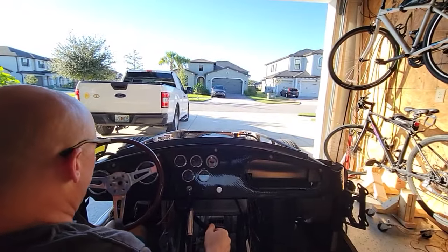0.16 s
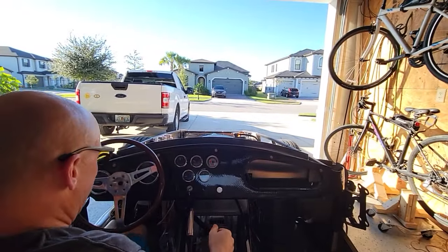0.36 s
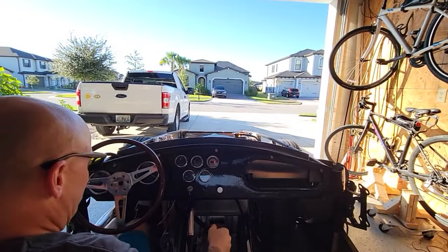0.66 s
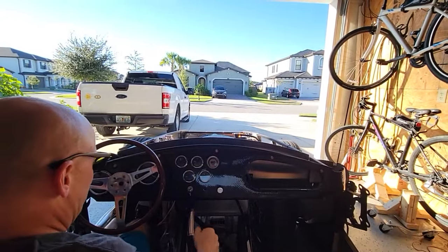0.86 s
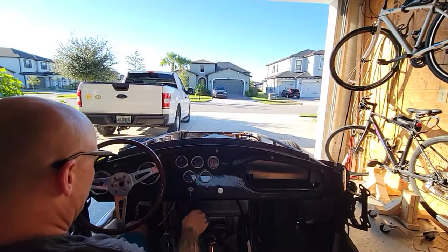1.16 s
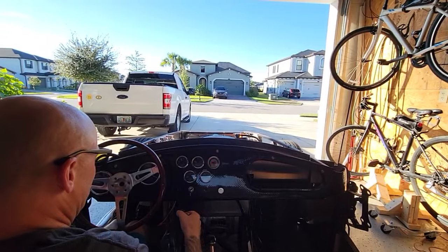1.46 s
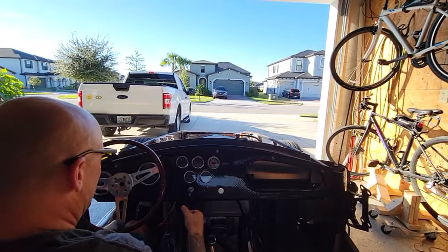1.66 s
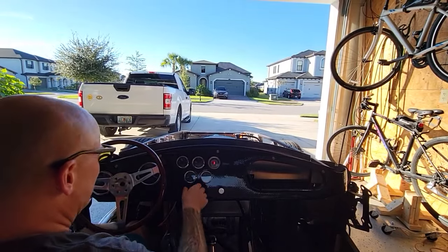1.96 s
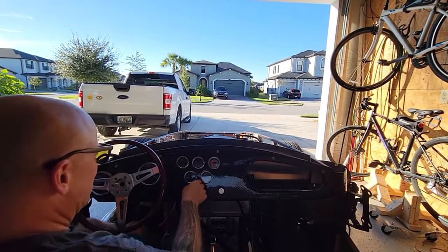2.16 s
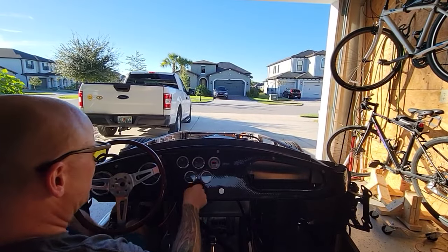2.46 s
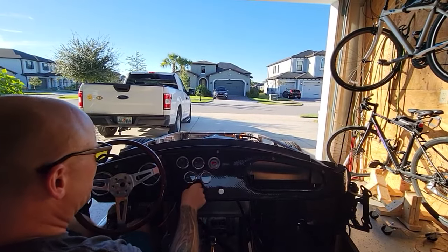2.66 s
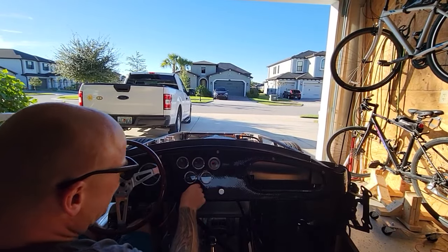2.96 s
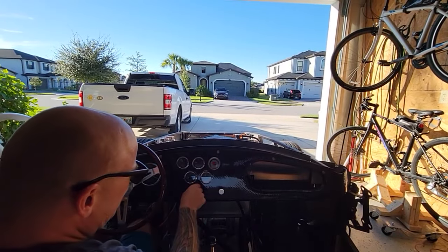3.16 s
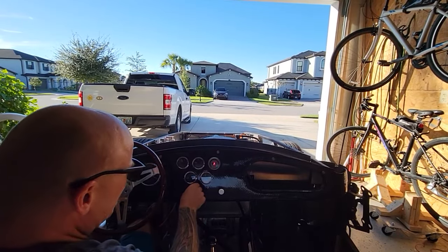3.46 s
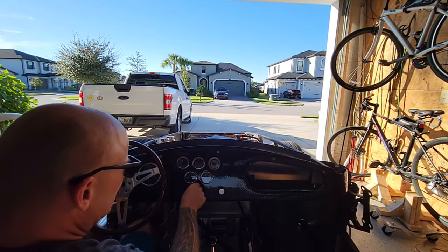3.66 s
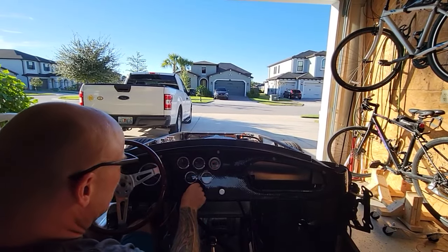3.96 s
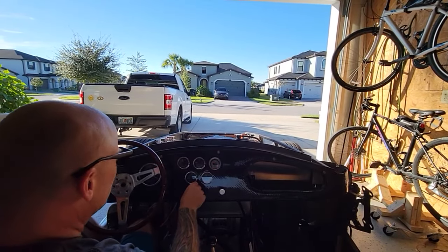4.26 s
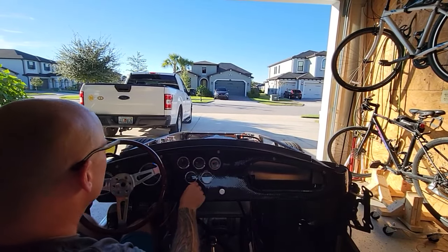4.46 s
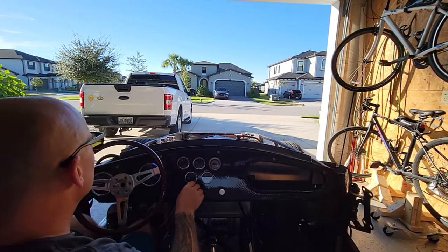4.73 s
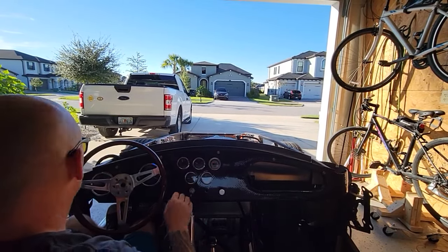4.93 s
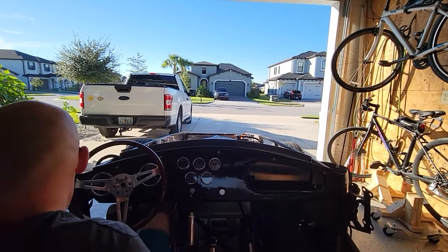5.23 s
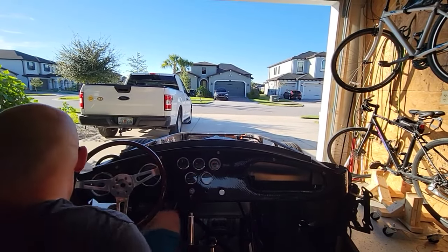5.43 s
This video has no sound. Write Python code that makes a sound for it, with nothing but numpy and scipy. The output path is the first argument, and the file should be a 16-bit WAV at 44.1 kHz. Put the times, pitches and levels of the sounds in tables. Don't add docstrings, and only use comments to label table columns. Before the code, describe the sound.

Close stereo sound in a kit-style car parked in an open garage: a deep, fluttering idle with slight speed hunting and airy hiss. Small key ticks and a bright metal clack come early, followed by rapid handbrake teeth. After about four seconds the engine is switched off, puffs and slows to a halt with a tiny belt squeak, then a soft low drone and sinking fan tone remain.

```python
import sys
import numpy as np
from scipy import signal
from scipy.fft import rfft, irfft, next_fast_len
from scipy.io import wavfile
from scipy.ndimage import uniform_filter1d, map_coordinates

SR = 44100
rng = np.random.default_rng(int(sys.argv[2]) if len(sys.argv) > 2 else 0)


def volts(x):
    e = np.asarray(x, float) / 20
    return 10 ** e


def int16_out(signal):
    q = np.round(np.clip(np.atleast_2d(signal).T, -1, 1) * 32767)
    wavfile.write(sys.argv[1], SR, q.astype(np.int16))


N = 246500

BANK_SIGNS = [1, -1, -1, 1, -1, 1, 1, -1]
CYLINDER_DB = [4.5, .3, -4.5, -.4, 4.2, 0, -4.2, .3]
# pitch_hz, level_db
PIPES_TOGETHER = [(20, -40), (45, -18), (58, -9), (77, 0), (96, -14), (125, -2), (154, 0), (175, -3),
                  (231, -19), (300, -24), (385, -22), (480, -28), (700, -34), (1500, -60)]
# pitch_hz, level_db
PIPES_APART = [(20, -34), (48, -12), (67, -14), (87, -15), (106, -7), (125, 0), (150, -4), (183, -12),
               (202, -8), (250, -28), (350, -22), (480, -28), (700, -32), (1500, -62)]
# pitch_hz, level_db
UNEVEN_BURNS = [(15, -71), (30, -12), (48, -6), (80, -8), (108, 4), (118, 4), (130, 6.5), (150, -8),
                (175, -1.5), (195, -2.5), (228, -11), (250, -26), (500, -34), (1500, -71)]
# pitch_hz, level_db
UNFIRED_PIPES = [(20, -37), (40, -2), (70, 1.5), (92, -4.5), (107, 16.5), (122, 7), (150, -3.5), (200, -5),
                 (240, -21.5), (500, -34.5), (1500, -65)]
# pitch_hz, level_db (per Hz)
ROAR_COLOUR = [(140, -40), (230, -1), (264, -7), (376, 5.5), (434, -5), (482, -1.5), (593, -14),
               (681, -1.5), (720, -23), (745, -40), (804, -63.5), (975, -36), (1200, -22), (1560, -76),
               (2640, -120)]
GEAR_COLOUR = [(470, -48), (800, -41), (977, -5.5), (1310, -5), (1780, 3), (2380, -1), (3090, -1.5),
               (3450, -4), (4100, -4.5), (7000, -16), (9100, -44), (15400, -120)]
HISS_COLOUR = [(2940, -19.5), (5000, -5), (6690, -5), (9170, 1.5), (11000, -2.5), (12600, 3.5),
               (14100, -1.5), (15600, -8)]
# start_s, firings_hz
IDLE_SPEED = [(0, 70.5), (.25, 73.5), (.65, 76.7), (1.3, 76.3), (1.75, 77.2), (2.2, 76.8), (2.35, 73.7),
              (2.5, 72.4), (2.8, 75.9), (3.1, 77.4), (3.55, 78), (3.85, 79.9), (4.1, 80.2), (4.16, 79)]
# start_s, level_db
ENGINE_LOAD = [(0, 0), (1.2, 0), (1.7, -1), (2.5, -0.5), (3.6, 2), (4.12, 1)]
# start_s, level_db
UNFIRED_STROKES = [(4.2, -21.5), (4.3, -16), (4.42, -20), (4.46, -24), (4.53, -14), (4.6, -30),
                   (4.652, -12), (4.71, -34.5), (4.76, -40)]
# pitch_hz, level_db, unsteadiness_hz
PUMP_HUMS = [(703, -47, 9), (906, -57, 8), (1000, -60, 10), (1615, -63, 12), (1741, -61, 20)]
# start_s, peak_db
LEVER_HITS = [
    (.8962, -17),
    (.8995, -23),
    (.908, -25),
    (.9175, -27),
    (.929, -30),
]
# pitch_hz, level_db
LEVER_TONES = [(2370, -5), (2720, 1.5), (3160, 1.5), (3650, -30.5), (4160, -1), (4550, 6), (5000, -11),
               (5450, 1), (6100, -13), (6750, 0), (7350, 1), (8200, -20), (8750, -11), (9120, 4)]
# pitch_hz, level_db
LEVER_BLOW = [(600, -24), (1200, -6), (2400, -2.5), (3200, -6), (4500, 3), (6000, 2), (9000, -3),
              (10500, -14), (13000, -3), (15800, -18.5)]
# start_s, peak_db
BRAKE_TEETH = [
    (1.422, -11.5),
    (1.4437, -12.5),
    (1.4641, -14),
    (1.484, -13),
    (1.508, -9.5),
    (1.5604, -9.5),
]
# pitch_hz, level_db (per Hz)
PAWL_COLOUR = [(1760, -32), (3000, -16.5), (4010, -12), (4270, -9), (4640, -10), (5820, -15), (8640, -2.5),
               (10700, -3.5), (11800, -0.5), (13600, -1.5), (15600, -12.5)]
# pitch_hz, level_db (per Hz)
CABLE_COLOUR = [(450, -33), (760, -6), (814, -13.5), (929, 1.5), (1190, -15), (1410, -5), (1590, -12.5),
                (1920, -10.5), (3000, -31), (3900, -47), (6600, -120)]
# start_s, level_db
FAN_LOUDNESS = [(0, -41.5), (4.2, -36.5), (4.9, -60), (5.08, -50.5), (5.16, -45.5), (5.35, -45),
                (5.5, -56.5), (5.59, -48)]
# start_s, peak_db, pitch_hz, t60_s (time to fall 60 dB), relative_spread
SMALL_TICKS = [
    (.878, -25, 12300, 0.033, 0.044),
    (1.0288, -27, 7140, 0.034, .03),
    (1.1384, -28, 12770, .08, .04),
    (4.724, -40, 8380, 0.091, .045),
    (4.745, -39, 8150, 0.13, .02),
    (4.895, -58, 8900, 0.1, .012),
    (4.926, -60, 8800, 0.13, .012),
]
# pitch_hz, level_db (per Hz)
BOOM_COLOUR = [(15, -45), (30, -10), (62, -5.5), (85, -1), (105, -2), (125, -14.5), (150, -6.5), (180, -23),
               (300, -94)]
# pitch_hz, level_db (per Hz)
STREET_COLOUR = [(70, -39), (120, -10), (180, -13), (230, -9.5), (306, -17), (400, -14), (500, -14.5),
                 (700, -19), (960, -21), (2000, -30), (5000, -35.5), (7000, -40), (12000, -44.5),
                 (15600, -49)]
# pitch_hz, t60_s
GARAGE_ECHO = [(60, 0.55), (300, 0.56), (2000, 0.13), (12000, 0.061)]
# pitch_hz, likeness (1 = the same)
EAR_LIKENESS = [(60, 1), (125, 0.5), (250, 0.5), (500, 0.65), (1000, 0.013), (4000, 0.13), (12000, 0)]
# pitch_hz, level_db
EAR_LEAN = [(60, -.3), (125, -.3), (250, -1.8), (500, -3), (1000, -2.2), (2000, -1.2), (4000, -3),
            (6000, 1), (8500, 4), (11500, -3), (15000, -2)]

CUT_S, FIRE_OUT_S, STOP_S, SETTLE_S = 4.16, .05, 4.8, .09


def engine():
    turn = np.cumsum(speed()) / SR
    running = ramp([STOP_S, STOP_S + SETTLE_S], [1, 0]) ** 2
    return exhaust(turn, running) + running * (gas_and_gears(turn) + case()) + pump_hums()


def exhaust(turn, running):
    t = np.arange(N) / SR
    at = np.flatnonzero(np.diff(np.floor(turn)) * (t[1:] < STOP_S))
    which = np.arange(len(at)) % 8
    even, banked = np.zeros((2, N))
    even[at] = volts(np.take(CYLINDER_DB, which))
    banked[at] = np.take(BANK_SIGNS, which) * even[at]

    fire = ramp([CUT_S, CUT_S + FIRE_OUT_S], [1, 0])
    uneven = fire * np.sqrt(40 / SR) * rng.standard_normal(N) * volts(4 * np.cos(np.pi * turn / 2))
    unfired = (1 - fire) * (even + .45 * banked) * volts(1.5 * wobble(30))

    def longer_pipe(hz):
        return causal(PIPES_APART)(hz) * np.exp(-2j * np.pi * hz * 0.004014)

    pipes = filtered(fire * even, causal(PIPES_TOGETHER))
    pipes += filtered(fire * banked, longer_pipe)
    pipes += filtered(uneven, causal(UNEVEN_BURNS))
    pipes += filtered(unfired, causal(UNFIRED_PIPES))

    fired_db = -17
    load_db, = curves(ENGINE_LOAD)
    strokes_db, = curves([(CUT_S, fired_db), *UNFIRED_STROKES])
    effort_db = np.where(t < CUT_S, fired_db + 0.22 * load_db, strokes_db)
    pump_db = -22 + ramp([CUT_S, CUT_S + 0.21, STOP_S - 0.24, STOP_S], [-30, 0, 0, -9])
    pumping = volts(pump_db) * running ** 2 * np.sin(4 * np.pi * turn) * volts(2.5 * wobble(38))
    return garage(volts(effort_db) * running * steady(pipes) + pumping, wet_db=-17)


def gas_and_gears(turn):
    load_db, = curves(ENGINE_LOAD)
    slowed = slowed_db()
    roar_db = -33 + 0.45 * load_db + 3 * slowed
    gear_db = -39 + 0.42 * load_db + 1.02 * slowed
    hiss_db = -32.5 + 1.2 * load_db + 1.26 * slowed
    puff_db = 0.99 * np.cos(2 * np.pi * turn)
    puff_db += 0.71 * np.cos(np.pi * turn / 2)
    puff_db += 0.84 * np.cos(np.pi * turn / 4 + .8)
    roar = volts(roar_db + puff_db) * rush(ROAR_COLOUR, patchy_db=-1.0)
    gear = volts(gear_db + 0.54 * puff_db + 0.23 * wobble(29.57)) * rush(GEAR_COLOUR, patchy_db=1.0)
    hiss = volts(hiss_db + 0.65 * puff_db + 0.44 * wobble(30.02)) * rush(HISS_COLOUR, patchy_db=0.7)
    return roar + gear + hiss


def case():
    level_db = -45 + .25 * slowed_db() + 4.2 * wobble(25.09)
    return volts(level_db) * np.sin(2 * np.pi * 668 * np.arange(N) / SR + 2.0 * wobble(35))


def pump_hums():
    t = np.arange(N) / SR
    hums = np.zeros(N)
    for hz, db, rate in PUMP_HUMS:
        hums += volts(db + 4 * wobble(rate)) * np.sin(2 * np.pi * hz * t + 1.5 * wobble(rate))
    end_s, fade_db_per_s = 5.15, 150
    return hums * volts(0.69 * slowed_db() - fade_db_per_s * np.maximum(t - end_s, 0))


def speed():
    t = np.arange(N) / SR
    friction_hz, drag_s = 60, 1.1
    since_cut = np.clip(t, CUT_S, STOP_S) - CUT_S
    coast = (IDLE_SPEED[-1][1] + friction_hz) * np.exp(-since_cut / drag_s) - friction_hz
    return np.where(t < CUT_S, curves(IDLE_SPEED)[0], coast)


def slowed_db():
    return (np.arange(N) / SR > CUT_S) * 20 * np.log10(speed() / IDLE_SPEED[-1][1])


def lever():
    bar, blow, t = np.zeros(N + SR), np.zeros(N + SR), np.arange(SR // 8) / SR
    for s, db in LEVER_HITS:
        ring = np.zeros(len(t))
        for hz, level in LEVER_TONES:
            phase = rng.uniform(0, 2 * np.pi)
            ring += volts(level + rng.normal(0, 4.2)) * np.sin(2 * np.pi * hz * t + phase)
        add_at(bar, s, volts(db - 15 - 60 * t / .05) * ring)
        add_at(blow, s, volts(db + 5.0 - 60 * t / 0.036) * rng.standard_normal(len(t)))
    return garage(bar[:N] + filtered(blow[:N], causal(LEVER_BLOW)), wet_db=-8)


def handbrake():
    spray, t = np.zeros(N + SR), np.arange(SR // 8) / SR
    for s, db in BRAKE_TEETH:
        fall = volts(db - 7.5 - 60 * t / 0.11) + volts(db - 11 - 60 * t / 0.012)
        add_at(spray, s, fall * (1 - np.exp(-t / 0.0013)))
    first, last = BRAKE_TEETH[0][0], BRAKE_TEETH[-1][0] + 0.038
    stroke_db = ramp([first - .012, first, first + 0.073, last, last + 0.049, last + .1],
                     [-40, 0, 4, -5.5, -30, -90])
    scrape = volts(-33 + stroke_db + 2.4 * wobble(120)) * rush(CABLE_COLOUR, patchy_db=1.5)
    return spray[:N] * rush(PAWL_COLOUR, patchy_db=-2.0) + scrape


def fan():
    blade_hz, coast_s, coast_hz_per_s2 = 241, 4.5, 38
    hz = blade_hz - coast_hz_per_s2 * np.maximum(np.arange(N) / SR - coast_s, 0) ** 2
    phase = 2 * np.pi * np.cumsum(hz * (1 + .015 * wobble(25))) / SR
    tones = np.zeros((2, N))
    for k, level, lag in [(1, -3.5, 0.21), (2, -3.5, 0.61), (3, -8.0, 1.0), (4, -16.5, 1.0)]:
        for ear, side in enumerate((-1, 1)):
            tones[ear] += volts(level + 3.0 * wobble(18)) * np.sin(k * phase + side * lag)
    return volts(curves(FAN_LOUDNESS)[0]) * tones


def ticks():
    x, t = np.zeros(N + SR), np.arange(SR // 4) / SR
    for s, db, hz, t60, share in SMALL_TICKS:
        luck = rng.standard_normal((9, 2))
        tone_hz = hz * (1 + share * luck[:, :1])
        ring = np.sin(2 * np.pi * tone_hz * t + 3 * luck[:, 1:]).sum(axis=0)
        add_at(x, s, volts(db - 8.5 - 60 * t / t60) * ring * (1 - np.exp(-t / 0.00096)))
    return x[:N]


def street():
    rest = STOP_S + SETTLE_S - .03
    rise_s, drone_db, drone_end_s = 0.13, -45.5, 5.36
    boom_db = ramp([rest - rise_s, rest, rest + 0.14, drone_end_s, drone_end_s + 0.065],
                   [drone_db, -37, drone_db, drone_db - 3.5, drone_db - 13])
    street_db = -43.5 + ramp([rest - rise_s, rest, rest + 1], [4, 0, -5.5])
    boom = rush(BOOM_COLOUR, patchy_db=-4.0)
    boom = boom / np.sqrt(abs(uniform_filter1d(boom[0] ** 2, size=3500)) + 1e-9)
    return volts(boom_db) * boom + volts(street_db - 3.0) * rush(STREET_COLOUR, patchy_db=0.8)


def garage(x, wet_db):
    hz, t, z = signal.stft(rng.standard_normal((2, SR // 2)), SR, nperseg=1024)
    fall = volts(-60 * t / along(GARAGE_ECHO, hz)[:, None])
    tail = signal.istft(z * fall, SR, nperseg=1024)[1]
    wet = signal.fftconvolve(x[None], tail / np.linalg.norm(tail[0]), axes=1)[:, :N]
    return x + volts(wet_db) * spread(wet, np.ones_like)


def rush(spectrum, patchy_db):
    z = signal.stft(rng.standard_normal((2, N)), nperseg=512)[2]
    field = uniform_filter1d(rng.standard_normal(z.shape[1:]), size=6, axis=0)
    field = uniform_filter1d(field, size=12, axis=1)
    pair = signal.istft(z * volts(patchy_db * unit(field)), nperseg=512)[1][:, :N]
    return unit(spread(pair, lambda hz: volts(along(spectrum, hz))))


def spread(pair, gain):
    def mid_side_gain(hz):
        angle = np.arccos(np.clip(along(EAR_LIKENESS, hz), -1, 1)) / 2
        return gain(hz) * [np.cos(angle), np.sin(angle)]

    mid, side = filtered(pair, mid_side_gain)
    return np.array([mid + side, mid - side])


def filtered(x, response):
    m = 2 * next_fast_len(N // 2 + SR // 2)
    return irfft(rfft(x, m) * response(np.fft.rfftfreq(m, 1 / SR)), m)[..., :N]


def causal(points):
    def response(hz):
        c = irfft(np.log(volts(along(points, hz))))
        c[1:len(hz) - 1] *= 2
        c[len(hz):] = 0
        return np.exp(rfft(c))
    return response


def steady(x):
    power = uniform_filter1d(uniform_filter1d(x ** 2, size=9000), size=9000)
    return x / np.sqrt(abs(power) + 1e-12)


def unit(x):
    return x / np.sqrt(np.mean(x ** 2) + 1e-20)


def add_at(track, start_s, burst):
    track[round(start_s * SR):][:len(burst)] += burst


def along(points, hz):
    f, v = np.transpose(points)
    return np.interp(np.log(hz + 1), np.log(f + 1), v)


def curves(rows):
    s, *cols = np.transpose(rows)
    return [np.interp(np.arange(N) / SR, s, c) for c in cols]


def ramp(times, values):
    return np.interp(np.arange(N) / SR, times, values)


def wobble(rate):
    return map_coordinates(rng.standard_normal(int(N * rate / SR) + 4), [np.arange(N) * rate / SR])


def scene():
    return engine() + lever() + handbrake() + fan() + ticks() + street()


def roll_off(x):
    return signal.sosfilt(signal.butter(12, 15800, fs=SR, output="sos"), x)


def record(dry):
    def lean(hz):
        return volts(along(EAR_LEAN, hz) * [[.5], [-.5]]) * (hz < 15780)

    mix = filtered(dry, lean)
    return roll_off(mix)


dry = scene()
out = record(dry)
int16_out(out)
```